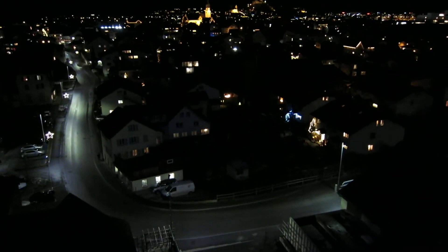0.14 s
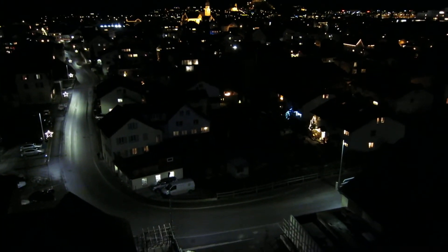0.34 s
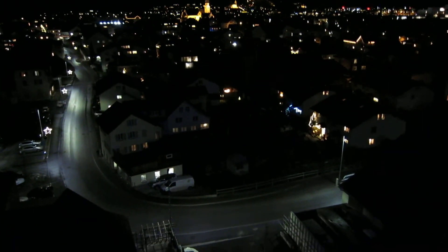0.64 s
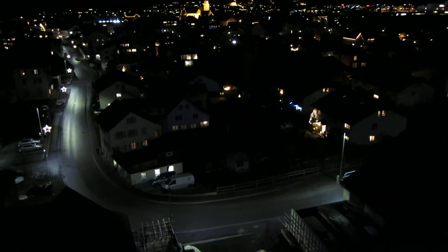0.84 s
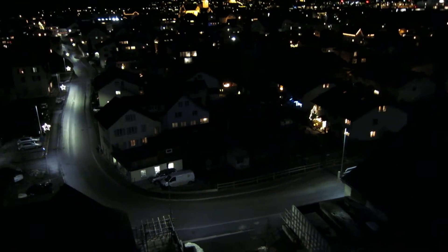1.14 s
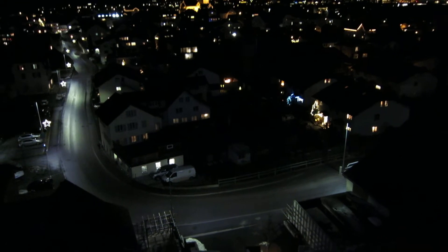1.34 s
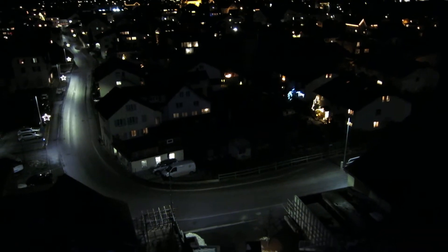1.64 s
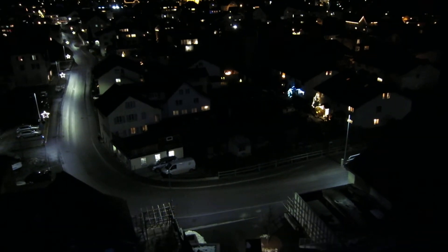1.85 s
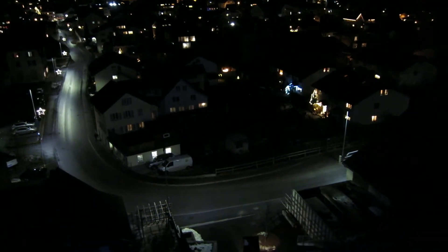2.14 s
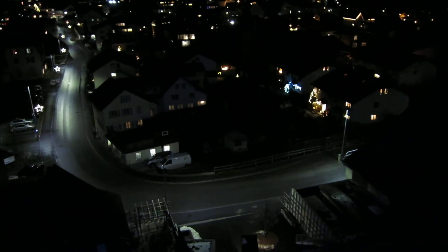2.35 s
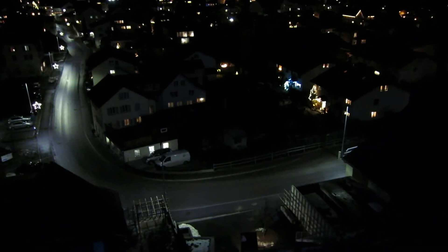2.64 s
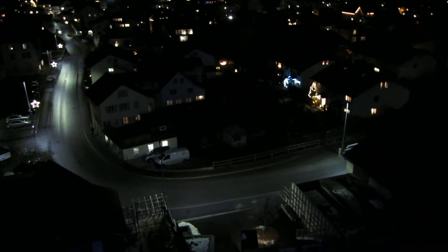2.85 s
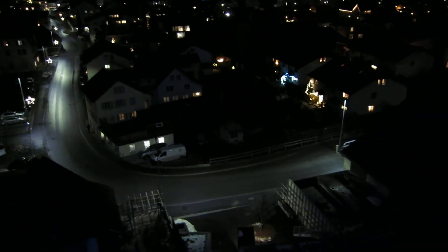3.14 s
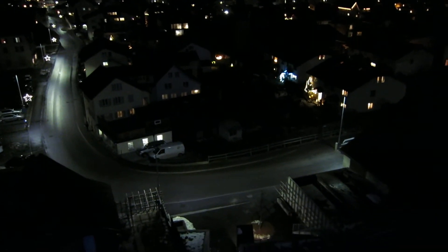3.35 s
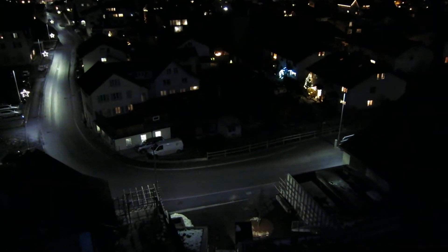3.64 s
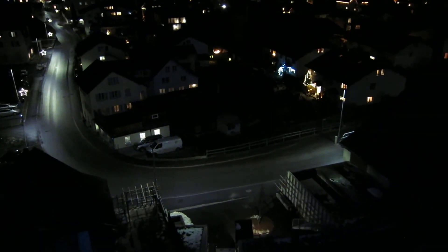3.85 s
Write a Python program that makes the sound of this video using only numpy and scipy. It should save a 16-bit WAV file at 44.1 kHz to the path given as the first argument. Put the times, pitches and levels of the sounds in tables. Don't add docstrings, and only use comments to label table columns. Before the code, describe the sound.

A cabin rolls up an incline track at night with a low, booming rumble and wavering cable drone; wind thumps hard against the close stereo microphone, distorting early on, then a sharp tick cracks midway.

```python
import sys
import numpy as np
from scipy import signal
from scipy.fft import rfft, irfft
from scipy.io import wavfile
from scipy.ndimage import uniform_filter1d

SR = 44100
rng = np.random.default_rng(int(sys.argv[2]) if len(sys.argv) > 2 else 0)


def rack_gain(trim_db):
    fader = np.asarray(trim_db, float)
    return 10 ** (fader / 20)


def generate_wav(sig):
    pcm = np.round(np.clip(np.atleast_2d(sig).T, -1, 1) * 32767).astype(np.int16)
    wavfile.write(sys.argv[1], SR, pcm)


N = 176400


def evened(x):
    return x / np.sqrt(np.mean(x ** 2) + 1e-20)


def curve(points, t):
    return np.interp(t, *np.transpose(points))


def coloured(x, spectrum):
    hz, db = np.transpose(spectrum)
    bins_hz = np.fft.rfftfreq(N, 1 / SR)
    gain = rack_gain(np.interp(np.log(bins_hz + 1), np.log(hz + 1), db))
    return irfft(rfft(x) * gain, N)


def resonate(x, hz, width_hz):
    turn = np.exp(2j * np.pi * hz * np.arange(x.shape[-1]) / SR)
    r = np.exp(-np.pi * width_hz / SR)
    return 2 * (turn * signal.lfilter([1 - r], [1, -r], x / turn)).real


def slow(per_s):
    hz = np.fft.rfftfreq(N, 1 / SR)
    return evened(irfft(rfft(rng.standard_normal(N)) * np.exp(-(hz / per_s) ** 2), N))


def bump(t, centre_s, length_s):
    return np.exp(-(2 * (t - centre_s) / length_s) ** 2)


# (time [s], gain [dB])
RECORDER_GAIN = [(0, 13.5), (.095, 2), (.102, -6.5), (.6, -1.5), (.77, 0), (.84, -9.5), (1.1, -4.5),
                 (1.379, -2.5), (1.385, -14), (1.7, -9.5), (2.1, -5), (2.5, -4.5), (2.9, -3), (3.25, 0.5),
                 (3.3, -3), (3.6, -3.5), (4, -3)]


def gain_db(t):
    return curve(RECORDER_GAIN, t)


# (time [s], level [dB])
ROUGHNESS = [(0.0, -74), (0.1, -30), (0.15, -34.5), (0.82, -35.5), (0.88, -41.5), (1.38, -33),
             (1.43, -44.5), (1.95, -45), (1.99, -46), (2.12, -53), (2.17, -28), (3.0, -37.5), (3.26, -26.5),
             (3.32, -35), (3.94, -32.5), (4.0, -30.5)]
ROUGHNESS_MEAN_DB = -32


def shake_db(t):
    return curve(ROUGHNESS, t) - gain_db(t) - ROUGHNESS_MEAN_DB


# (start [s], end [s], level [dB])
GUSTS_AT_MIC = [(.062, .145, -15), (.185, .21, -24), (.23, .41, -36), (.45, .5, -21), (.75, .85, -15),
                (1.07, 1.14, -28), (1.16, 1.255, -21), (1.32, 1.355, -27), (1.355, 1.4, -16),
                (1.405, 1.43, -29), (1.54, 1.575, -29), (1.66, 1.76, -36), (1.8, 1.825, -33),
                (1.92, 1.98, -31), (1.98, 2.035, -15), (2.035, 2.08, -26), (2.415, 2.5, -25),
                (2.55, 2.6, -33), (2.6, 2.68, -27), (2.93, 3.1, -42), (3.12, 3.17, -30), (3.23, 3.31, -22),
                (3.33, 3.355, -27), (3.58, 3.72, -36), (3.72, 3.79, -24), (3.91, 4.02, -25)]
# (time [s], peak [dB], pitch [Hz])
STRONG_EDDIES = [(.0955, 2.2, 190), (.455, -7, 240), (.7564, -3, 170), (.7749, -6, 150), (.7929, -4, 200),
                 (.8154, -2, 200), (.831, -5, 260), (1.078, -16, 150), (1.1955, -5, 220), (1.3809, .3, 290),
                 (1.551, -13, 200), (1.9573, -12, 220), (2.463, -14, 280), (2.558, -22, 160),
                 (2.704, -22, 230), (3.154, -18, 150), (3.2375, -8, 250), (3.2665, -2, 230),
                 (3.754, -10, 190), (3.968, -14, 330)]
# (frequency [Hz], density [dB])
WIND_SPECTRUM = [(20, -14), (60, 1.5), (150, 0), (285, -6.5), (540, -24), (800, -37), (1500, -66)]
GUST_EDGE_S, EVEN_S = .009, .034
LUMP_DB, LUMPS_PER_S = 3, 50
BREEZE_DB, LEAK_DB = -45.5, -16
EDDY_TURNS, EDDY_SNAP = .44, .3


def wind():
    t = np.arange(N) / SR
    power = rack_gain(2 * BREEZE_DB)
    for start_s, end_s, db in GUSTS_AT_MIC:
        gate = np.tanh((t - start_s) / GUST_EDGE_S) - np.tanh((t - end_s) / GUST_EDGE_S)
        power = power + rack_gain(2 * db) * gate ** 2 / 4
    air = coloured(rng.standard_normal((2, N)), WIND_SPECTRUM)
    span = round(EVEN_S * SR)
    air = air / np.sqrt(uniform_filter1d(uniform_filter1d(air ** 2, span), span))
    side, mid = air * np.sqrt(power) * evened(rack_gain(LUMP_DB * slow(LUMPS_PER_S)))

    for s, db, hz in STRONG_EDDIES:
        u = (t - s) * hz
        turn = rng.random()
        if db > 0:
            turn = 1 / 4
        envelope = np.exp(-(u / EDDY_TURNS) ** 2)
        core = EDDY_SNAP * np.exp(-(3 * u / EDDY_TURNS) ** 2)
        eddy = (envelope + core) * np.cos(2 * np.pi * (u + turn))
        side = side * (1 - envelope) + rack_gain(db) * eddy / abs(eddy).max()
    mid = rack_gain(LEAK_DB) * resonate(mid, 207.0, 277.0)
    return np.array([mid + side, mid - side]) / rack_gain(gain_db(t))


# (time [s], level [dB])
DRONE_LEVEL = [(0.0, -21), (0.15, -46), (0.3, -27), (0.33, -36.5), (1.35, -36.5), (1.44, -45.5),
               (1.97, -42.5), (1.99, -49.5), (2.18, -28), (2.39, -53), (2.57, -27), (2.88, -38),
               (3.17, -23), (3.34, -37.5), (3.65, -27), (3.78, -40.5), (3.85, -36.5), (4.0, -31.5)]
DRONE_HZ, WAVER_HZ, WAVERS_PER_S, THROB_DB = 89, 5.5, 12, 2.8


def drone():
    t = np.arange(N) / SR
    turns = np.cumsum(DRONE_HZ + WAVER_HZ * slow(WAVERS_PER_S)) / SR
    level_db = curve(DRONE_LEVEL, t) - gain_db(t) + THROB_DB * slow(17.0)
    return np.sqrt(2) * rack_gain(level_db) * np.sin(2 * np.pi * turns)


def tick(t, s, db, hz, width_hz):
    u = np.maximum(t - s, 0)
    envelope = np.exp(-np.pi * width_hz * u) * np.tanh(width_hz * u * 6.8)
    return rack_gain(db) * envelope * np.sin(2 * np.pi * hz * u)


# (time [s], level [dB], pitch [Hz], width [Hz], left-right [dB])
DAMPED_TICKS = [(.6346, -30, 5200, 500, 0), (.635, -35, 10800, 250, 0), (.64, -30, 14100, 900, -4),
                (.64, -34, 8800, 500, -3), (.64, -31, 5000, 1500, 0), (.64, -34, 2100, 300, -3),
                (1.504, -46, 14000, 2000, 0), (1.527, -40, 10500, 4000, 0), (1.5875, -33, 11500, 3500, 3),
                (1.588, -43, 6500, 300, 0), (2.1999, -13, 11700, 1300, -7), (2.1999, -23, 8600, 900, -7),
                (2.1999, -24, 5200, 1800, -5), (2.1999, -19, 1900, 1300, -7), (2.2003, -18, 1000, 200, -5),
                (1.3801, -17, 9000, 9000, 0), (1.3801, -20, 1600, 900, 0), (.0957, -28, 3500, 2200, 0),
                (.0735, -27, 1300, 500, 0), (2.2205, -29, 1700, 700, -3), (2.225, -27, 800, 200, -3),
                (3.61, -30, 1000, 400, 0), (3.632, -30, 1000, 400, 0), (3.802, -28, 900, 400, 0),
                (.0957, -19, 1500, 800, 0)]
# (time [s], level [dB], pitch [Hz], width [Hz])
OPPOSED_TICKS = [
    (.64, -24, 11300, 1800),
    (2.2, -20, 1100, 700),
    (1.74, -27, 900, 700),
    (.64, -18, 600, 700),
    (1.3809, -17, 10500, 5000),
    (1.3809, -14, 3300, 2500),
]
# (pitch [Hz], width [Hz], level [dB])
SHIMMER = [(4900, 900, -54), (5800, 900, -53), (10700, 700, -60)]
SHIMMER_S, SHIMMER_FADE_S = .636, .034
# (centre [s], length [s], pitch [Hz], level [dB])
FAINT_SQUEAKS = [
    (.782, .06, 1665, -53),
    (.953, .055, 1665, -47),
    (1.9, .07, 1520, -53),
]


def fittings():
    t = np.arange(N) / SR
    out = np.zeros((2, N))
    for k, (s, db, hz, width_hz, pan_db) in enumerate(DAMPED_TICKS):
        pan = rack_gain(np.array([[.5], [-.5]]) * pan_db)
        out += (-1) ** k * pan * tick(t, s, db, hz, width_hz)
    for row in OPPOSED_TICKS:
        out += np.array([[1], [-1]]) * tick(t, *row)
    fade = (t > SHIMMER_S) * np.exp(-abs(t - SHIMMER_S) / SHIMMER_FADE_S)
    for hz, width_hz, db in SHIMMER:
        ring = resonate(resonate(rng.standard_normal(N), hz, width_hz), hz, width_hz)
        out += rack_gain(db) * fade * evened(ring)
    for s, length_s, hz, db in FAINT_SQUEAKS:
        out += rack_gain(db) * bump(t, s, length_s) * np.sin(2 * np.pi * hz * t + 0.36 * slow(30.))
    return out


# (centre [s], length [s], pitch [Hz], level [dB])
WHEEL_THUDS = [(0.084, 0.056, 127.5, -20.5), (0.271, 0.055, 288.6, -30.5), (0.619, 0.072, 290, -32.5),
               (0.793, 0.015, 153.5, -20), (1.986, .03, 170, -32.5), (2.198, 0.073, 127.8, -31.5),
               (2.44, 0.058, 130, -27.5), (2.47, 0.043, 499, -38), (2.562, 0.063, 184.3, -33.5),
               (2.62, 0.16, 796, -47.5), (2.657, 0.1, 200, -32.5), (1.82, .05, 185, -44),
               (3.05, .06, 150, -31), (.66, 0.045, 172.5, -30), (2.84, 0.27, 130.3, -30),
               (3.122, 0.046, 292, -29), (3.265, 0.0089, 202.5, -19), (3.58, 0.031, 287.6, -25.5),
               (3.725, 0.091, 136.4, -27.5), (3.932, 0.023, 301, -24.5)]


def thuds():
    t = np.arange(N) / SR
    out = np.zeros(N)
    for s, length_s, hz, db in WHEEL_THUDS:
        out += rack_gain(db + 1) * bump(t, s, length_s) * np.sin(2 * np.pi * hz * t)
    return out / rack_gain(gain_db(t))


# (pitch [Hz], width [Hz], level [dB])
PANEL_MODES = [(34, 10, -47), (98, 10, -40), (130, 9, -38), (184, 12, -42), (290, 25, -42), (350, 20, -43),
               (495, 18, -50), (605, 14, -55), (797, 20, -54), (2034, 25, -71)]
PANEL_SHARE = .81


def panels():
    t = np.arange(N) / SR
    boom = np.zeros(N)
    for hz, width_hz, db in PANEL_MODES:
        level_db = db + 2.28 * slow(4.9)
        ring = resonate(resonate(rng.standard_normal(N), hz, width_hz), hz, 4.8 * width_hz)
        boom += rack_gain(level_db) * evened(ring)
    return boom * rack_gain(PANEL_SHARE * shake_db(t))


# (frequency [Hz], density [dB])
BODY_SPECTRUM = [(55, -15), (300, -7), (700, -19), (1050, -26), (3100, -42.5), (11500, -48), (13500, -53.5),
                 (15800, -60)]
# (frequency [Hz], level [dB])
SIDE_SPECTRUM = [(100, -35), (500, -10), (1000, -4), (2000, -4.5), (3500, -12), (5500, -13), (8000, -9.5),
                 (12000, -3.5)]
# (time [s], swell [dB], fade [s], centre [Hz])
RAIL_JOINTS = [(0, 6, 0.039, 1490), (.062, 12, 0.086, 1200), (.64, 4, 0.04, 600), (1.16, 6, 0.046, 1480),
               (1.3, 0.5, .1, 6000), (1.88, 5.5, 0.043, 1750), (2.202, 12.5, 0.066, 1090),
               (2.222, 2, .01, 1800), (2.255, 3.5, 0.033, 1180), (2.4, 7, 0.23, 494),
               (2.52, 4, 0.044, 1000), (2.662, 6.5, 0.033, 5950), (2.68, 7, 0.028, 2000),
               (3.13, 7.5, 0.087, 1170), (3.495, 8, 0.085, 4030), (3.612, 3, .015, 1500),
               (3.634, 3, 0.021, 1500), (3.8, 1.5, .02, 1200), (3.76, 2.5, 0.76, 6000)]
JOINT_OCTAVES, JOINT_RISE_S = 1.6, .005
BODY_DB, BODY_SHARE = -34, .066


def rumble():
    frames = N // 128 + 5
    hz = np.fft.rfftfreq(512, 1 / SR)[:, None]
    t = np.arange(frames) * 128 / SR
    a, b, c, d, patches = rng.standard_normal((frames, 257, 5)).T
    patches = evened(uniform_filter1d(uniform_filter1d(patches, size=6, axis=0), size=16, axis=1))
    flicker = evened(uniform_filter1d(rng.standard_normal(frames), size=5))
    field_db = 1.46 * patches + 0.76 * flicker + BODY_SHARE * shake_db(t)
    for s, db, fade_s, centre_hz in RAIL_JOINTS:
        fade_s = max(fade_s, .005)
        rise = (np.minimum(t - s, 0) / JOINT_RISE_S) ** 2
        shape = np.exp(-np.maximum(t - s, 0) / fade_s - rise)
        band = np.exp(-(np.log2((hz + 1) / centre_hz) / JOINT_OCTAVES) ** 2)
        field_db = field_db + db * shape * band
    spectra = np.array([a + 1j * b, c + 1j * d]) * rack_gain(field_db)
    mid, side = signal.istft(spectra, nperseg=512, noverlap=384)[1][:, :N]
    mid = coloured(mid, BODY_SPECTRUM)
    side = coloured(coloured(side, BODY_SPECTRUM), SIDE_SPECTRUM)
    return rack_gain(BODY_DB) * np.array([mid + side, mid - side]) / np.std(mid)


def scene():
    return wind() + rumble() + panels() + drone() + fittings() + thuds()


def top_cut(x):
    return signal.sosfilt(signal.butter(12, 15830, fs=SR, output="sos"), x)


def record(dry):
    loud = np.clip(dry * rack_gain(gain_db(np.arange(N) / SR)), -1, 1)
    low_pass = signal.firwin(511, 15900, window=("kaiser", 9), fs=SR)
    mix = signal.oaconvolve(loud, low_pass[None], "same")
    return top_cut(mix)


dry = scene()
out = record(dry)
generate_wav(out)
```